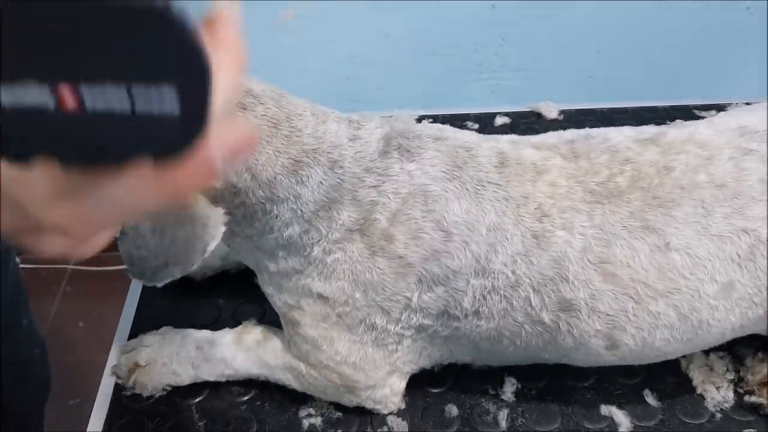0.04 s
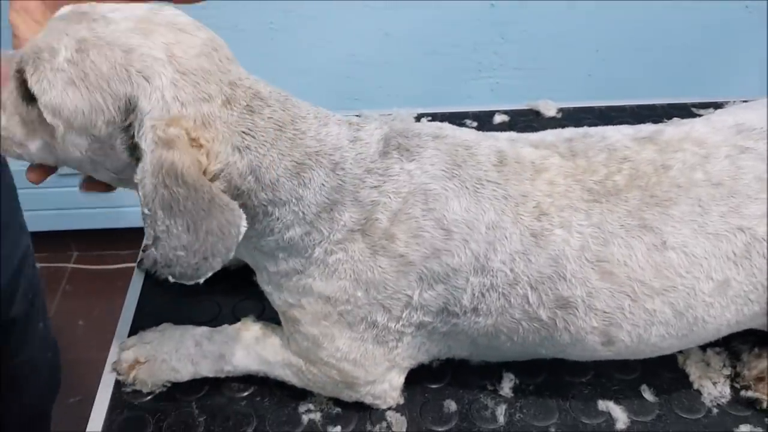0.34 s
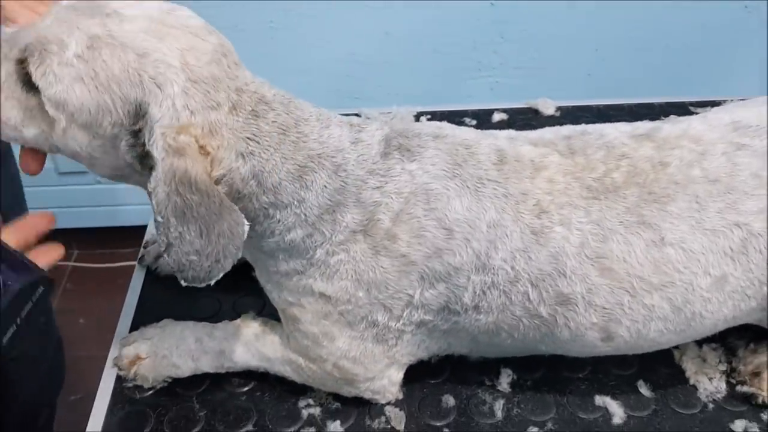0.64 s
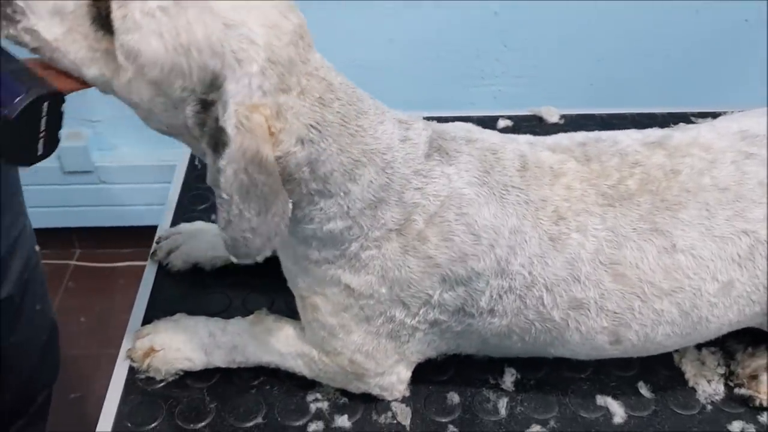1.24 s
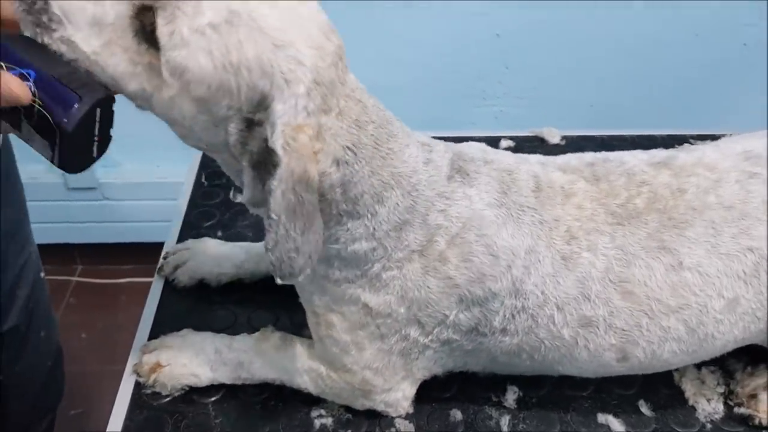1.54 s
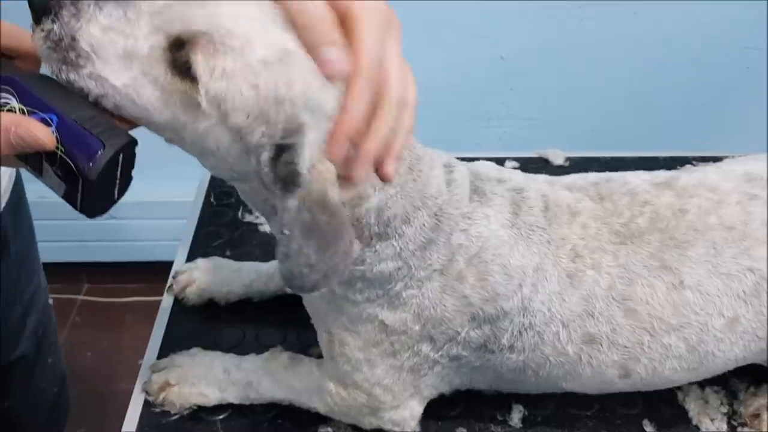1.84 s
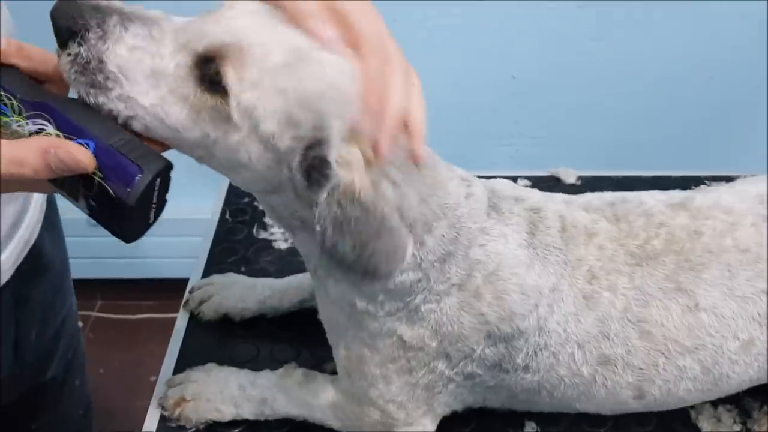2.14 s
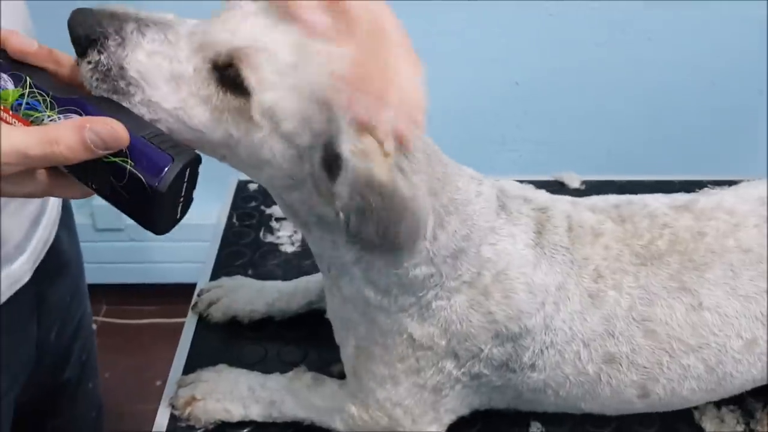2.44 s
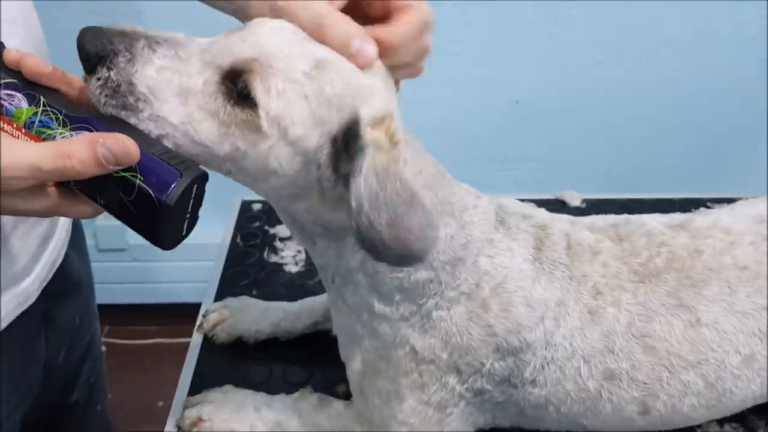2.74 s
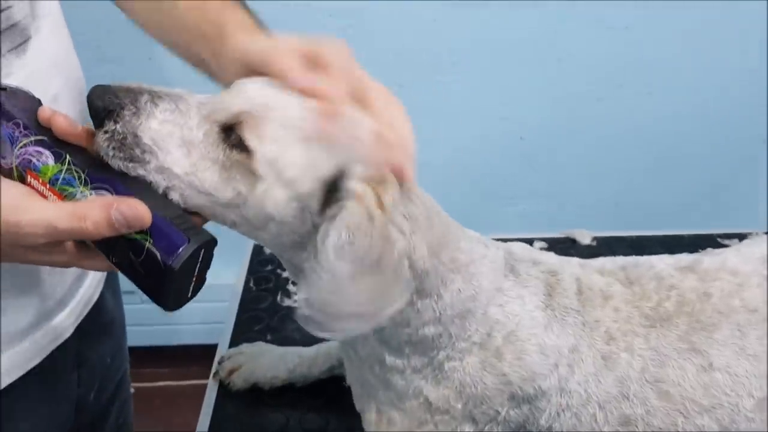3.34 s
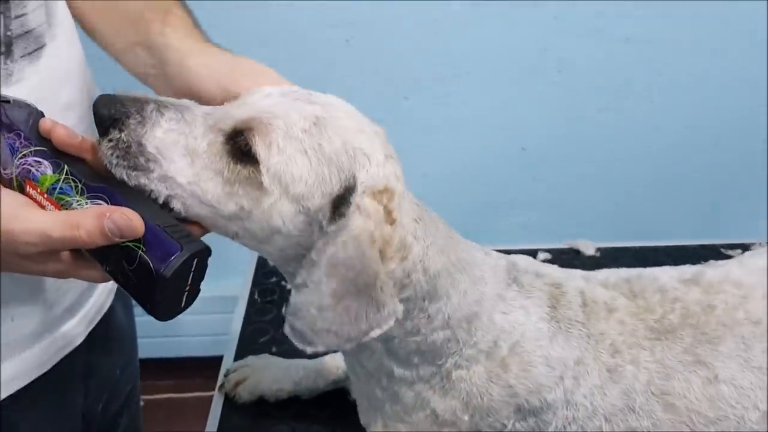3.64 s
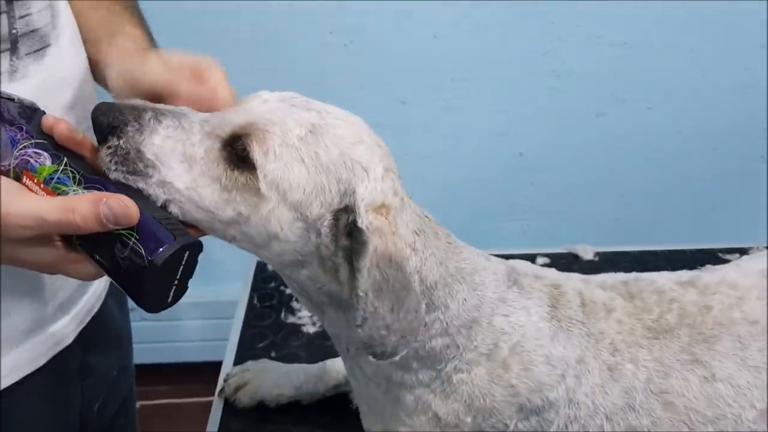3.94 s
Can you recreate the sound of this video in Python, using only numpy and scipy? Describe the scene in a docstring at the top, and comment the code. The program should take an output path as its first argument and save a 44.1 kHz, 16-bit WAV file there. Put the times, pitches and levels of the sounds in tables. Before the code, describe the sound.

A brief spray hisses in rapid spurts in a bare, echoing grooming room. Quick, quiet strokes over a dog's fur follow on the near left, joined later by a knock, a tick and a bump over low rumble.

```python
"""In a bare, echoing grooming room, over room noise and low handling rumble, a container sputters out
a short, rasping hiss: quick spurts that ring its resonances, with low handling thuds beneath.
Then a hand rubs a dog's short coat in quick strokes close to the left of the microphone.
Among the strokes come a faint squeak and a few soft scuffs, later a hollow knock, a tick
and a dull bump."""
import sys
import numpy as np
from scipy import signal
from scipy.fft import rfft, irfft, next_fast_len
from scipy.io import wavfile
from scipy.ndimage import map_coordinates

SR = 44100
rng = np.random.default_rng(int(sys.argv[2]) if len(sys.argv) > 2 else 0)


def generate_wav(sig):
    """Save sig (samples, or channels by samples) to the path in sys.argv[1] as 16-bit PCM at SR."""
    pcm = np.round(np.clip(np.atleast_2d(sig).T, -1, 1) * 32767).astype(np.int16)
    wavfile.write(sys.argv[1], SR, pcm)


N = 176400  # 4 s


def amp(db):
    """Decibels to gain."""
    return 10 ** (np.asarray(db) / 20)


def unit(x):
    """Scale to rms 1."""
    return x / np.sqrt(np.mean(x ** 2) + 1e-20)


def along(points, hz):
    """Interpolate (Hz, value) points on a log frequency axis."""
    point_hz, values = np.transpose(points)
    return np.interp(np.log(hz + 1), np.log(point_hz + 1), values)


def level(points):
    """Gain per sample from (s, dB) points."""
    return amp(np.interp(np.arange(N) / SR, *np.transpose(points)))


def swell(middle_s, sigma_s):
    """Gaussian envelope, peak 1."""
    return np.exp(-0.5 * ((np.arange(N) / SR - middle_s) / sigma_s) ** 2)


def wobble(rate_hz):
    """Smooth curve through random knots."""
    knots = rng.standard_normal(int(N * rate_hz / SR) + 4)
    return map_coordinates(knots, [np.arange(N) * rate_hz / SR])


def filtered(x, response):
    """Apply a frequency response, given as a function of Hz."""
    n = x.shape[-1]
    padded = next_fast_len(n + n // 8)
    hz = np.fft.rfftfreq(padded, 1 / SR)
    return irfft(rfft(x, padded) * response(hz), padded)[..., :n]


def spread(pair):
    """Mix two independent signals to stereo: alike in the bass, unrelated in the treble."""
    # Each row: frequency in Hz, left-right correlation.
    correlation = [(60, 0.96), (200, 0.89), (550, 0.45), (1500, 0), (10000, 0.02)]
    angle = lambda hz: np.arccos(np.clip(along(correlation, hz), -1, 1)) / 2
    mid, side = filtered(pair, lambda hz: np.array([np.cos(angle(hz)), np.sin(angle(hz))]))
    return np.array([mid + side, mid - side])


def noise(response, size=N):
    """Coloured stereo noise, rms 1."""
    return unit(spread(filtered(rng.standard_normal((2, size)), response)))


def pan(x, db):
    """Raise left over right by db."""
    return x * amp(np.array([[db], [-db]]) / 2)


def in_room(x, room_db, pan_db):
    """Panned direct sound plus the hard walls' tail, whose treble dies first."""
    # Each row: frequency in Hz, T60 in seconds.
    decay = [(100, 0.91), (300, 0.66), (2400, 0.68), (5000, 0.62), (9000, 0.29), (15000, 0.26)]
    build_up_s = 0.0028
    hz, t, spectra = signal.stft(rng.standard_normal((2, SR)), SR, nperseg=256)
    spectra *= amp(-60 * t / along(decay, hz)[:, None])
    tail = spread(signal.istft(spectra, SR, nperseg=256)[1])
    tail *= 1 - np.exp(-(np.arange(tail.shape[1]) / SR / build_up_s) ** 2)
    wet = signal.fftconvolve(x, tail / np.linalg.norm(tail[0]), axes=1)[:, :N]
    return pan(x, pan_db) + amp(room_db) * wet


def hits(events, modes, rise_s, room_db, pan_db, low_hz):
    """Soft-edged blows ring damped modes; little radiates below low_hz."""
    x = np.zeros(N)
    for start_s, db in events:
        t = np.maximum(np.arange(N) / SR - start_s, 0)
        contact = 1 - np.exp(-(t / rise_s) ** 2)
        for hz, mode_db, t60_s in modes:
            x -= amp(db + mode_db - 60 * t / t60_s) * contact * np.sin(2 * np.pi * hz * t)
    highpass = lambda hz: -hz ** 2 / (low_hz ** 2 - hz ** 2 + 1j * np.sqrt(2) * hz * low_hz)
    x = filtered(x, highpass)
    return in_room(np.array([x, x]), room_db, pan_db)


def background():
    """Steady room noise and a low handling rumble that swells and sinks."""
    # Each row: frequency in Hz, gain in dB.
    air_colour = [(28, -30.5), (52, -5.5), (115, -0.5), (190, 0), (270, -9), (370, -9.5), (520, -19),
                  (750, -24), (1500, -31.5), (3000, -36), (4800, -35), (7500, -39.5), (10000, -35),
                  (14500, -27.5), (15800, -40)]
    # Each row: frequency in Hz, gain in dB.
    rumble_colour = [(20, -41), (38, -13.5), (52, -7.5), (60, -2), (65, 4), (71, -9.5), (82, -17),
                     (110, -17), (250, -43), (800, -100)]
    # Each row: time in seconds, level in dB.
    rumble_levels = [(0, -65), (.1, -46), (.32, -61), (.53, -69), (.78, -63.5), (.88, -52), (.97, -57),
                     (1.05, -67), (2.3, -67.5), (2.6, -57.5), (3.2, -64.5), (4, -57.5)]
    air = amp(-63) * noise(lambda hz: amp(along(air_colour, hz)))
    rumble = level(rumble_levels) * noise(lambda hz: amp(along(rumble_colour, hz)))
    return pan(air, db=0.5) + pan(rumble, db=-0.7)


def thuds():
    """Handling thuds: slow contacts ring two bass modes."""
    # Each row: start in seconds, level in dB.
    events = [(.068, -39.5), (.2, -46.5), (.552, -44)]
    # Each row: frequency in Hz, gain in dB, T60 in seconds.
    modes = [(65.6, 8, 0.22), (95, -9, 0.14)]
    return hits(events, modes, rise_s=0.012, room_db=-4.5, pan_db=1, low_hz=46.3)


def squeak():
    """Faint, unsteady whistle: a narrow noise band swells and fades."""
    # In order: middle and sigma in seconds, level in dB, pitch and width in Hz.
    whistle = (.87, .035, -77, 4570, 170)
    middle_s, sigma_s, db, pitch_hz, width_hz = whistle
    tone = noise(lambda hz: np.exp(-0.5 * ((hz - pitch_hz) / width_hz) ** 2))
    return in_room(amp(db) * swell(middle_s, sigma_s) * tone, room_db=-4, pan_db=-1)


def scuffs():
    """Soft, dull rubs, each a noise band with a fluttering level."""
    # Each row: middle and sigma in seconds, level in dB, centre in Hz, width in octaves.
    rubs = [(0.893, 0.012, -64, 1080, 0.46), (0.989, 0.075, -68, 1550, 1.24),
            (1.246, 0.071, -68, 2200, 1.45), (1.454, 0.18, -71, 362, 0.13),
            (2.18, 0.023, -72.5, 1320, 0.21), (2.273, 0.16, -77, 1120, 0.43),
            (3.848, 0.38, -78.5, 778, 0.86)]
    x = np.zeros((2, N))
    for middle_s, sigma_s, db, centre_hz, width_oct in rubs:
        band = noise(lambda hz: np.exp(-0.5 * (np.log2((hz + 1) / centre_hz) / width_oct) ** 2))
        x += amp(db) * swell(middle_s, sigma_s) * band
    flutter_db = 0.79 * wobble(rate_hz=120)
    return in_room(x * amp(flutter_db), room_db=-4, pan_db=0)


def tick():
    """Small tick on the left: high modes, gone at once."""
    # Each row: start in seconds, level in dB.
    events = [(2.7605, -53)]
    # Each row: frequency in Hz, gain in dB, T60 in seconds.
    modes = [(1740, 0, 0.012), (1900, -6.5, 0.0066), (5120, 2.5, 0.0052)]
    return hits(events, modes, rise_s=0.00043, room_db=0, pan_db=11.5, low_hz=907)


def bump():
    """Dull, well-damped bump just left of the microphone."""
    # Each row: start in seconds, level in dB.
    events = [(2.997, -41)]
    # Each row: frequency in Hz, gain in dB, T60 in seconds.
    modes = [(81, -4, 0.046), (211, 3, 0.0098), (578, -13.5, 0.0056), (2520, -11.5, 0.0012)]
    return hits(events, modes, rise_s=0.000079, room_db=-1.5, pan_db=28, low_hz=63.6)


def knock():
    """Hollow knock: the lowest modes ring longest."""
    # Each row: start in seconds, level in dB.
    events = [(2.3865, -37.5)]
    # Each row: frequency in Hz, gain in dB, T60 in seconds.
    modes = [(184.5, -11, 0.14), (296, -1, 0.064), (324, 4.5, 0.013), (488, 1.5, 0.0096), (790, -6, 0.0079),
             (1370, -10.5, 0.0096)]
    return hits(events, modes, rise_s=0.0005, room_db=-3.5, pan_db=1, low_hz=129)


def fur():
    """Each hand stroke swells and fades as a fine, grainy hiss of hairs."""
    # Each row: middle and sigma in seconds, level in dB.
    strokes = [(0.335, .03, -63), (0.483, 0.031, -68), (0.992, 0.1, -69.5), (1.213, .04, -61.5),
               (1.42, 0.096, -73.5), (1.804, 0.055, -72.5), (1.956, 0.038, -68.5), (2.1, 0.039, -70.5),
               (2.236, 0.034, -67), (2.373, 0.037, -66.5), (2.509, 0.032, -66), (2.648, 0.13, -72),
               (2.885, 0.042, -73.5), (3.014, 0.037, -70.5), (3.163, 0.036, -71.5), (3.283, 0.043, -67),
               (3.439, 0.044, -71.5), (3.761, 0.6, -79)]
    # Each row: frequency in Hz, gain in dB.
    colour = [(500, -4), (1500, -3), (3100, -13.5), (5300, -1), (7500, -3), (9500, 3.5), (11500, 2),
              (13500, 0), (15800, 3.5)]
    power = sum((amp(db) * swell(middle_s, sigma_s)) ** 2 for middle_s, sigma_s, db in strokes)
    hiss = noise(lambda hz: amp(along(colour, hz)))
    grain_db = wobble(rate_hz=660)
    hairs = unit(hiss * amp(grain_db))
    return in_room(np.sqrt(power) * hairs, room_db=-2.5, pan_db=8.5)


def container():
    """Strong and weak spurts over a hiss; the container's hum fades as its bright ring swells."""
    # Each row: frequency in Hz, gain in dB.
    colour = [(200, -27), (300, -18), (390, -16), (480, -25.5), (600, -22), (1150, -7.5), (1450, -5.5),
              (1780, -3), (2300, 0), (2650, 0.5), (3100, -5.5), (4200, -4), (5100, -1.5), (6500, -9),
              (10000, -11.5), (15000, -15.5)]
    # Each row: time in seconds, level in dB.
    flow_levels = [(0, -37.5), (.06, -41.5), (.1, -40), (.16, -39), (.205, -43.5), (.255, -53.5),
                   (.34, -100)]
    # Each row: middle in seconds, level in dB, tilt in dB per octave.
    spurts = [(.0045, -38, 0), (.0174, -27, 1.5), (0.0404, -30, 1), (0.052, -33, 3), (0.0642, -28, 3),
              (0.0748, -32.5, 1), (0.0874, -24, 2), (.099, -31.5, 1), (0.111, -30.5, -0.5),
              (.121, -35, -1.5), (0.134, -28.5, 0), (0.1458, -32, 1.5), (.158, -32, 2.5),
              (0.17, -35.5, -0.5), (.1822, -31, -3), (.194, -34, 0.5), (0.2095, -30.5, -2),
              (0.2268, -37, 1.5), (0.2532, -31.5, -0.5), (.259, -39, -1.5)]
    # Each row: centre and width in Hz, first and last gain in dB.
    resonances = [(382, 26, 13, -8.5), (1454, 28, 11.5, -0.5), (2114, 99, -17, 3), (2285, 200, -10.5, 6),
                  (2500, 100, -5, -3), (2690, 70, -22, 2.5)]
    # Each row: frequency in Hz, left over right in dB.
    balance = [(400, -1), (1400, 3), (2400, 1), (4500, -2), (8000, 4.5), (14000, 1)]
    ring_shift_s = 0.19

    def tilted(db_per_oct):
        return lambda hz: amp(along(colour, hz) + db_per_oct * np.log2((hz + 100) / 3000))

    flow = noise(tilted(db_per_oct=-0.97)) * level(flow_levels)
    sputter_db = 2 * wobble(rate_hz=420)
    flow *= amp(sputter_db)
    for middle_s, db, db_per_oct in spurts:
        gate = swell(middle_s, sigma_s=0.0011)[:SR // 2]
        burst = noise(tilted(db_per_oct), size=len(gate)) * gate
        burst *= np.linalg.norm(gate) / np.linalg.norm(burst, axis=1, keepdims=True)
        flow[:, :len(gate)] += amp(db) * burst
    ring = np.zeros((2, N))
    for centre_hz, width_hz, first_db, last_db in resonances:
        drive = flow * level([(0, first_db), (ring_shift_s, last_db)])
        bandpass = lambda hz: 1j * hz * width_hz / (centre_hz ** 2 - hz ** 2 + 1j * hz * width_hz)
        ring += filtered(drive, bandpass)
    heard = in_room(flow + ring, room_db=-5, pan_db=1.8)
    return filtered(heard, lambda hz: amp(along(balance, hz) * np.array([[0.5], [-0.5]])))


def scene():
    """Stereo sum of all sources."""
    impacts = knock() + bump() + tick() + thuds()
    return impacts + container() + fur() + scuffs() + squeak() + background()


def record(dry):
    """Brick-wall low-pass."""
    top_hz = 15800
    return filtered(dry, lambda hz: hz < top_hz)


dry = scene()
out = record(dry)
generate_wav(out)
```